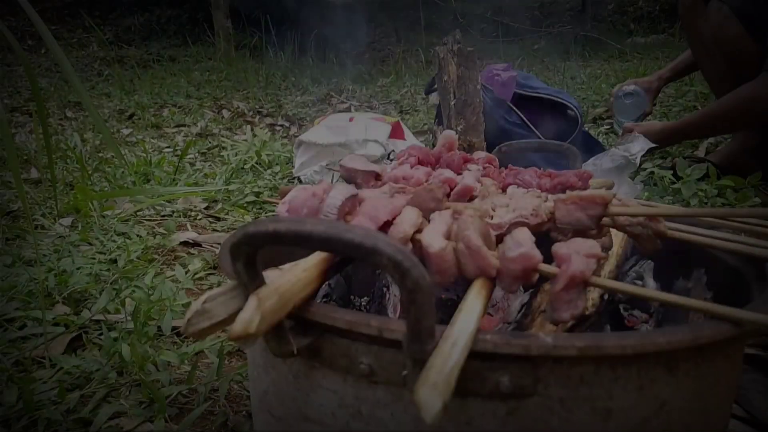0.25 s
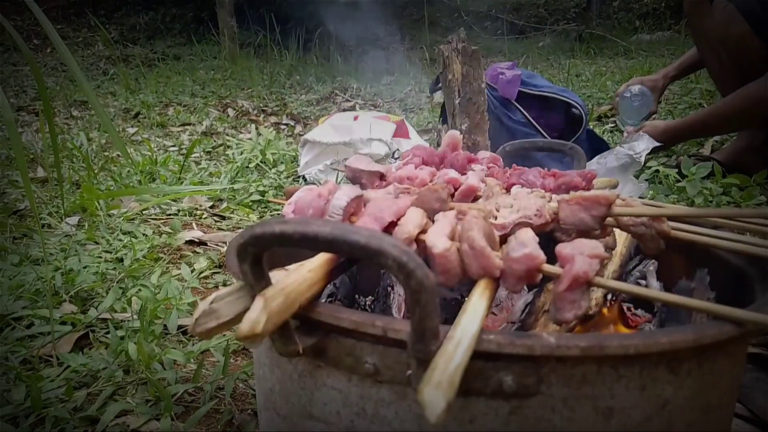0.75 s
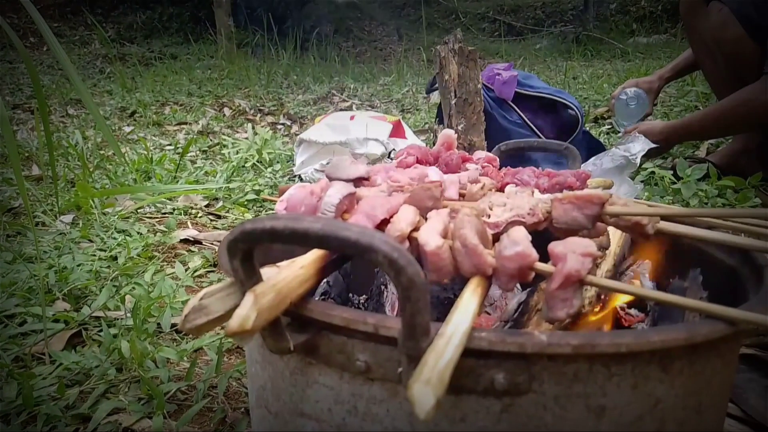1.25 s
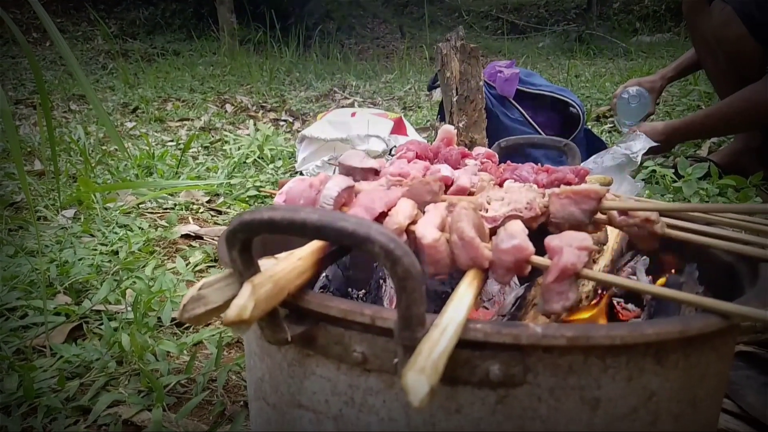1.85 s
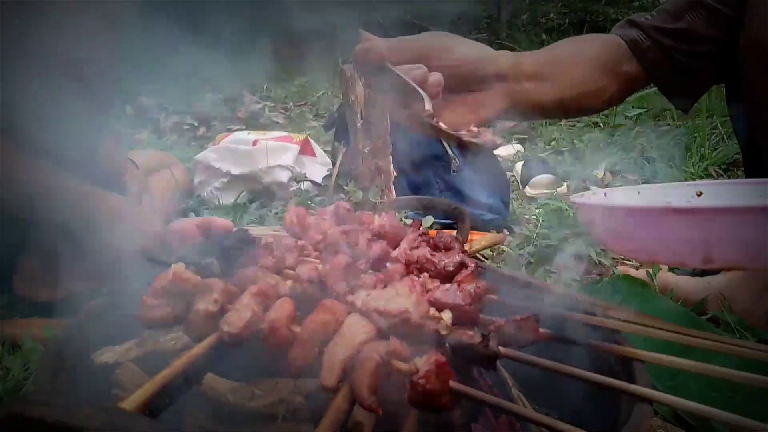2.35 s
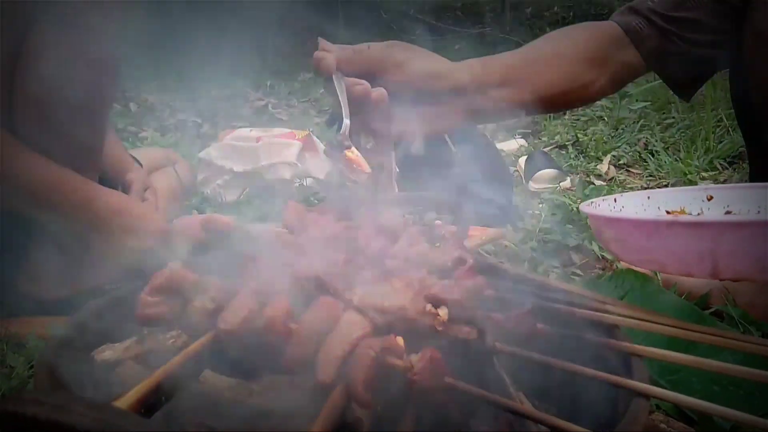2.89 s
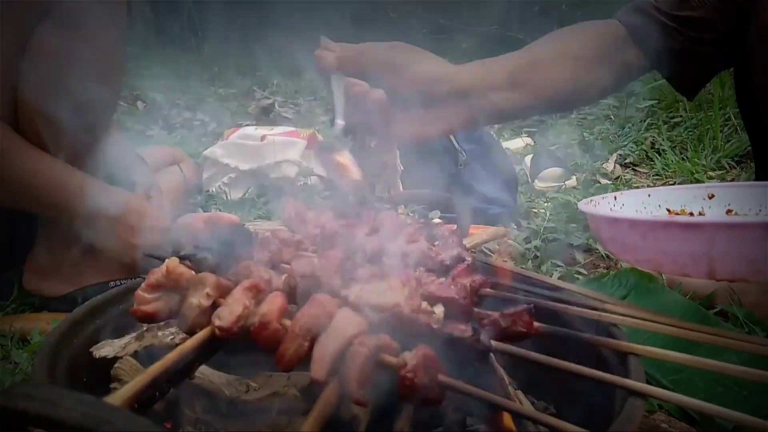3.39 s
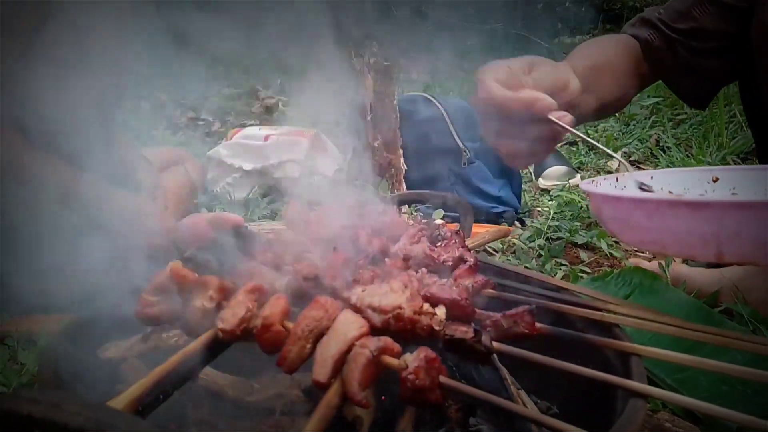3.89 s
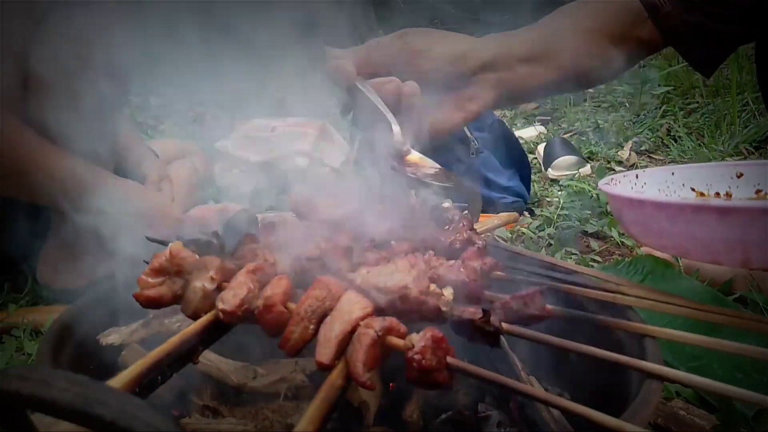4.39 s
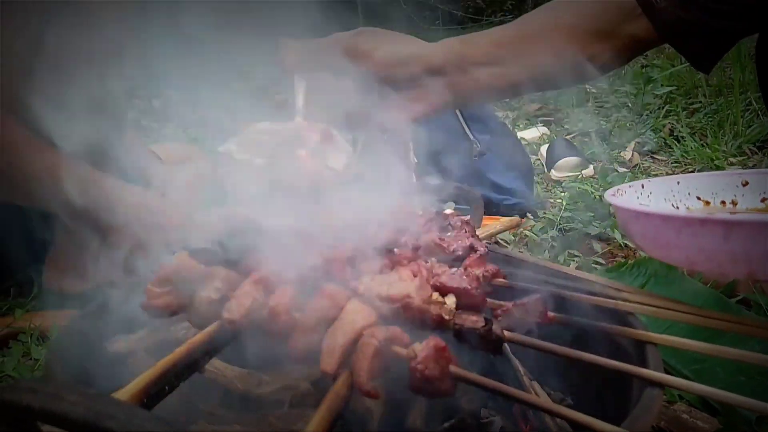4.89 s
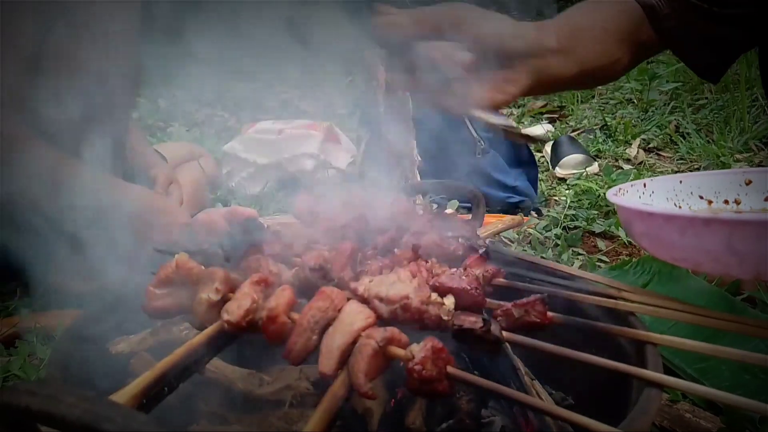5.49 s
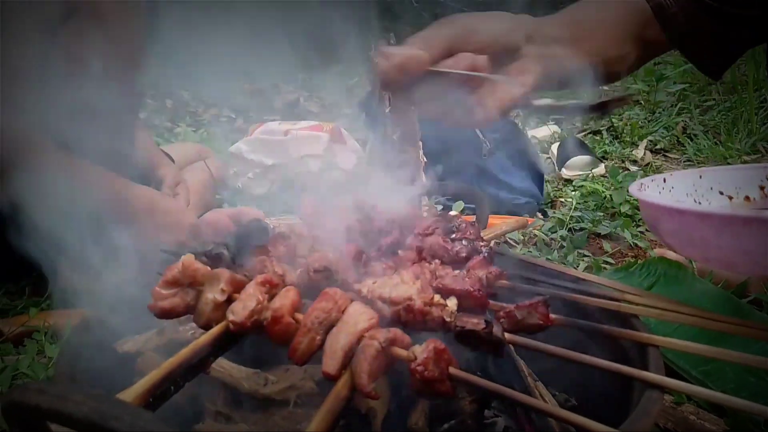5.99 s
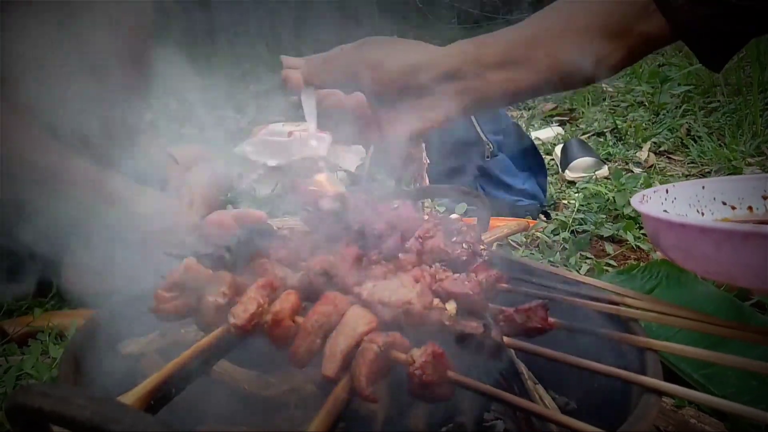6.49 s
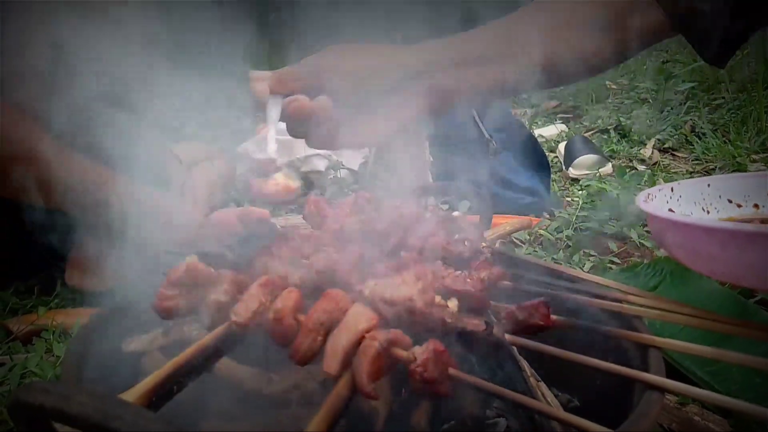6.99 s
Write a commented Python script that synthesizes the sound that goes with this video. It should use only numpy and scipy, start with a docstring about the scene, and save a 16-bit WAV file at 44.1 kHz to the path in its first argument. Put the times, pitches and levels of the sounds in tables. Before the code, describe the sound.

A cow's short tail of a moo, scattered metal clinks, a loud clang with gritty scraping, then two longer rising moos over faint outdoor rumble.

```python
"""A quiet farmyard in stereo: a cow moos three times, a little left of the microphones; voice pulses ring the head.
The first call starts open, the others as a closed-mouth hum; the first two end in a rasp,
the third stops just as its voice begins to break. Sheet metal clinks around the calls and once clangs,
as ringing modes; rubs of noise scrape, dry bursts snap. A far bird pipes in wavering sines
over a low outdoor rumble of shaped noise; yard and wall send echoes."""
import sys
import numpy as np
from scipy import signal
from scipy.fft import rfft, irfft
from scipy.io import wavfile
from scipy.ndimage import uniform_filter1d

SR = 44100
rng = np.random.default_rng(int(sys.argv[2]) if len(sys.argv) > 2 else 0)


def materialize(psi):
    """Save the field psi as 16-bit PCM at rate SR to the path in sys.argv[1].

    A 1-D psi becomes a single channel; in a 2-D psi each row is a channel.
    """
    bounded = np.clip(np.atleast_2d(psi).T, -1, 1)
    quanta = np.round(bounded * 32767).astype(np.int16)
    wavfile.write(sys.argv[1], SR, quanta)


N = 319725
TIME = np.arange(N) / SR

# pitch glide of the cow, one curve per call: (time [s], pitch [Hz])
CALL_PITCHES = [
    [(0.0, 148.9), (0.07, 152.6), (0.136, 148.7), (0.2, 143.2), (0.232, 138.6), (0.256, 141.6),
     (0.31, 136.8)],
    [(4.62, 101.8), (4.718, 111.3), (4.738, 118.9), (4.89, 138.9), (4.96, 144.9), (5.04, 144),
     (5.138, 149.7), (5.31, 152), (5.496, 159.3), (5.736, 155.5), (5.802, 149.1), (5.822, 145.4),
     (5.88, 131)],
    [(6.5, 103.4), (6.514, 104.1), (6.538, 110.7), (6.56, 111.1), (6.604, 115.2), (6.642, 110.2),
     (6.66, 116.1), (6.766, 137.6), (6.818, 144.6), (6.94, 152.1), (7.07, 155.7), (7.198, 160.2),
     (7.25, 160.1)],
]
# timing and head shape of each call, levels before effort and muffling:
# (mouth opens [s], opening takes [s], voice breaks [s], chest [dB], nose [dB], throat [dB],
#  palate [Hz], palate [dB], mouth [Hz], mouth [dB], lips [dB], edge [dB])
CALL_SHAPES = [(-0.1, 0.035, .188, -43.5, -28, -30, 1136, -18, 1705, -27.5, -24, -34.5),
               (4.985, .035, 5.725, -44, -30.5, -29.5, 1180, -31, 1637, -24.5, -44.5, -53.5),
               (6.74, 0.076, 7.24, -49, -27.5, -39, 1220, -29.5, 1678, -17.5, -30.5, -39.5)]
# stereo balance of the cow: (frequency [Hz], left over right [dB])
COW_BALANCE = [(850, .5), (1180, 4.5), (1620, -3), (2100, 5.5), (2900, 8.5)]
# modes of the sheet metal: (frequency [Hz], relative level [dB])
METAL_MODES = [(660, -5), (802, 1.5), (1663, -22), (3072, 2.5), (3303, 6.5), (3650, 0.5), (4070, 7),
               (4260, 4.5), (4560, -4), (4780, -2), (5080, -6), (5295, -0.5), (5410, -1), (5500, -3.5),
               (5815, 1), (6363, -10), (6590, -6.5), (7080, -5), (7396, -5.5), (8866, -3), (9300, -5),
               (9800, -5), (10249, -3.5), (10550, -12), (11230, -1.5), (11550, -5), (13420, -10.5)]
# blows on the metal, levels before the extra early ring:
# (time [s], boom [dB], ring [dB], hardness [0-1], ring centre [Hz], shimmer centre [Hz])
METAL_BLOWS = [(.010, -42, -52.5, 1, 4520, 9300), (0.515, -63, -42.5, 0.37, 4700, 11100),
               (0.647, -63, -39.5, 1, 4690, 11260), (.812, -72, -58.5, 0, 4070, 10000),
               (1.243, -57, -50.5, 0.33, 5030, 9250), (1.456, -44.5, -34.5, 0.58, 4990, 8750),
               (1.715, -56, -48, 0, 5260, 10600), (1.976, -62, -40, 0.15, 5340, 8600),
               (2.300, -56, -44.5, 0, 3480, 10600), (2.492, -69, -45.5, 0.92, 4580, 10500),
               (3.054, -24.5, -20, 0.26, 4280, 10240), (3.056, -29.5, -23.5, 0.24, 5640, 13380),
               (3.426, -41.5, -36.5, 0, 3660, 10750), (3.787, -57, -32, 0.2, 4520, 11700),
               (4.027, -46.5, -45, 0.32, 3610, 10460), (4.273, -56.5, -44, 0.98, 4080, 10340),
               (4.547, -54, -58, 0.46, 3400, 10250), (6.420, -65, -61, 0.36, 4220, 10440),
               (6.540, -64.5, -55, 0.4, 3400, 9900), (6.784, -62.5, -57, 0.28, 3620, 10420),
               (6.966, -61, -48, .75, 4800, 10960), (7.178, -46, -51.5, 0.6, 6130, 10350)]
# crowd of weak metal modes, heard as a wash: (frequency [Hz], relative density [dB per Hz])
METAL_WASH = [(300, -20), (750, 0.5), (1100, -14), (2200, -13.5), (3300, -0.5), (5600, -13), (7800, -10),
              (10500, -4.5), (15500, -26.5)]
# metal sliding on metal in short rubs: (time of peak [s], level [dB], fade to 1/e [s])
METAL_RUBS = [(3.105, -27, 0.033), (3.19, -31, 0.015), (3.241, -29.5, 0.0062), (3.276, -29, 0.035),
              (3.35, -42, 0.037)]
# dry snaps: (time [s], level [dB], 60 dB decay [s], main pitch [Hz], left over right [dB])
DRY_SNAPS = [(0.7223, -32.5, 0.031, 1490, -2.5), (3.243, -5, 0.00762, 6780, -8)]
# spectrum of a snap: (multiple of the main pitch, relative density [dB per Hz])
SNAP_COLOUR = [(.12, -45), (.26, -5), (.45, -1.5), (1, 7), (1.25, 0), (2.2, -16), (3.999, -43)]
# far bird notes: (time [s], level [dB])
BIRD_NOTES = [(0.448, -47), (2.838, -54), (6.592, -45.5)]
# spectrum of the outdoor air: (frequency [Hz], relative density [dB per Hz])
AIR_SPECTRUM = [(20, -14), (64, 1), (133, -6.5), (400, -17.5), (1050, -20.5), (1770, -28), (3000, -35),
                (6000, -41), (15500, -48)]
# likeness of the air on the two sides: (frequency [Hz], likeness [0-1])
AIR_LIKENESS = [(400, .96), (1200, .7), (3500, .2)]

# the cow pushes harder as the pitch climbs, which also sharpens the top of the voice
EFFORT_DB_PER_HZ, EASY_PITCH_HZ, BRIGHTEN_DB_PER_HZ = 0.4177, 150.77, 0.34
# below this pitch the folds are slack and grow rough
CLEAR_PITCH_HZ, SLACK_PER_HZ = 147.1, .013
# the break: time taken, most roughness added (0-1), time from the break until the air runs out
BREAK_S, RASP, RASP_HOLD_S = 0.04, .43, 0.063
# then the call dies; from the break on the closing mouth dulls it and the pitch sags
RELEASE_DB_PER_S, SHUT_DB_PER_S, SAG_HZ_PER_S = 236, 93, 190
ONSET_DB, ONSET_S = -9, 0.045   # the hum swells in from this far down
# shimmer against ring for a soft blow of usual strength, and what full hardness adds
SHIMMER_DB, SHIMMER_HARD_DB = -18.5, 17
SHIMMER_GROWTH, USUAL_BLOW_DB = 0.4, -46.5   # extra shimmer per dB above a usual blow
SOFT_SIDE_DB, HARD_SIDE_DB = 2.5, 5   # left over right when soft, and what full hardness adds


def from_db(db):
    """Decibels to gain."""
    return 10 ** (np.asarray(db) / 20)


def rms_one(x):
    """Scale to unit power."""
    return x / np.sqrt(np.mean(x ** 2) + 1e-20)


def in_time(rows, t):
    """Each column of a curve at the times t."""
    s, *columns = np.transpose(rows)
    return [np.interp(t, s, c) for c in columns]


def at_hz(points, hz):
    """Read a spectrum on a log-frequency axis."""
    f, value = np.transpose(points)
    return np.interp(np.log(hz + 1e-3), np.log(f), value)


def noise(spectrum, size):
    """Two unrelated channels of coloured noise."""
    gain = from_db(at_hz(spectrum, np.fft.rfftfreq(size, 1 / SR)))
    return rms_one(irfft(rfft(rng.standard_normal((2, size))) * gain, size))


def drift(rate_hz, size):
    """Smooth chance of spread 1."""
    sos = signal.butter(2, rate_hz, fs=SR, output="sos")
    return rms_one(signal.sosfilt(sos, rng.standard_normal(size + SR // 4))[-size:])


def pan(db):
    """Left and right gains of unit mean power; positive dB leans left."""
    gains = from_db(np.vstack([db / 2, -db / 2]))
    return gains / np.sqrt(np.mean(gains ** 2, axis=0))


def add(out, s, sound):
    """Mix a sound in from time s on."""
    start = max(round(s * SR), 0)
    part = sound[..., :N - start]
    out[..., start:start + part.shape[-1]] += part


def resonance(source, hz, width_hz, db):
    """A moving resonance, applied twice for steep flanks; its power is held at db over a few voice cycles."""
    r = np.exp(-np.pi * width_hz / SR)
    centre = np.exp(2j * np.pi * np.cumsum(hz * np.ones(len(source))) / SR)
    ring = np.real(centre * signal.lfilter([(1 - r) ** 2], [1, -2 * r, r * r], source / centre))
    power = uniform_filter1d(uniform_filter1d(ring ** 2, size=600), size=800)
    return from_db(db) * ring / np.sqrt(np.abs(power) + 1e-14)


def cow(lead_s=0.00011, bounce_s=.00625, bounce_db=-15):
    """Three calls from a little to the left, which hears them sooner and, at the top, brighter."""
    calls = np.zeros(N)
    for curve, call in zip(CALL_PITCHES, CALL_SHAPES):
        add(calls, curve[0][0], moo(curve, call))
    hz = np.fft.rfftfreq(N, 1 / SR)
    # a bounce off the ground makes the harmonics swell and fade as they glide
    bounce = 1 + from_db(bounce_db) * np.exp(-2j * np.pi * hz * bounce_s)
    left, right = rfft(calls) * bounce * pan(at_hz(COW_BALANCE, hz))
    late_right = right * np.exp(-2j * np.pi * hz * lead_s)
    return irfft([left, late_right], N)


def moo(curve, call, jitter=0.086, shimmer=1.0, turbulence=0.95, top_hz=3300, droop_hz=60,
        hum_db=-44, open_hum_db=-6, least_rough=.03):
    """Pulses of the vocal folds, uneven when rough, ring the resonances of the head."""
    (opens, opening_s, breaks, chest, nose, throat,
     palate_hz, palate, mouth_hz, mouth, lips, edge) = call
    t = np.arange(max(curve[0][0], 0), curve[-1][0], 1 / SR)
    pitch, = in_time(curve, t)

    # the possible stages: hum, open call, rasp, release; a call may start or stop partway
    opened = np.clip((t - opens) / opening_s, 0, 1)
    broken = np.clip((t - breaks) / BREAK_S, 0, 1)
    spent_s = np.maximum(t - breaks - RASP_HOLD_S, 0)
    effort = EFFORT_DB_PER_HZ * (pitch - EASY_PITCH_HZ) * (1 - broken)
    effort = effort - RELEASE_DB_PER_S * spent_s
    effort = effort + ONSET_DB * np.exp((t[0] - t) / ONSET_S) * (1 - opened)
    pitch = pitch - SAG_HZ_PER_S * np.maximum(t - breaks - BREAK_S / 2, 0)
    bright = BRIGHTEN_DB_PER_HZ * np.maximum(pitch - EASY_PITCH_HZ, 0)
    slack = SLACK_PER_HZ * np.maximum(CLEAR_PITCH_HZ - pitch, 0)
    rough = least_rough + np.minimum(slack + RASP * broken, RASP)

    # harmonics from the second up; the chest below supplies the fundamental
    phase = 2 * np.pi * np.cumsum(pitch * (1 + jitter * rough * drift(78, len(t)))) / SR
    pulses = rms_one(sum(np.cos(k * phase) for k in range(2, 30)))
    breath_band = signal.butter(2, [220, 4000], "band", fs=SR, output="sos")
    breath = rms_one(signal.sosfilt(breath_band, rng.standard_normal(len(t))))
    # air rushes through the folds once in each cycle
    rush = (rough + .05) * breath * (1 + np.cos(phase))
    source = pulses * (1 + shimmer * rough * drift(90, len(t))) + turbulence * rush

    def cavity(hz, width_hz, db, sharpness, muffled_db):
        """When open, weaker by sharpness dB per Hz to the nearest harmonic until the break; muffled when shut."""
        miss_hz = np.abs(hz - pitch * np.round(hz / pitch))
        miss_db = sharpness * miss_hz * opened * (1 - broken)
        return resonance(source, hz, width_hz, db + effort - miss_db + muffled_db * (1 - opened))

    voice = (cavity(hz=805.4, width_hz=130, db=throat - 5, sharpness=0.26, muffled_db=-24)
             + cavity(hz=934, width_hz=98, db=throat, sharpness=0.51, muffled_db=-32.5)
             + cavity(palate_hz, width_hz=100, db=palate, sharpness=0.22, muffled_db=-28)
             + cavity(mouth_hz, width_hz=182, db=mouth, sharpness=.15, muffled_db=-32.5)
             + cavity(hz=2063, width_hz=222, db=lips + 0.5, sharpness=0.07, muffled_db=-12)
             + cavity(hz=2420, width_hz=200, db=lips - 8.5 + bright, sharpness=0.087, muffled_db=-20)
             + cavity(hz=2863, width_hz=170, db=edge + bright, sharpness=0.087, muffled_db=-21))
    voice = voice * from_db(-SHUT_DB_PER_S * np.maximum(t - breaks, 0))
    voice += cavity(hz=320 - droop_hz * rough, width_hz=75.0, db=nose, sharpness=0.37, muffled_db=-17.5)
    # a soft hum through the closed mouth, soon drowned by the open call
    hum_level_db = hum_db + open_hum_db * opened + np.minimum(effort, 0)
    voice += resonance(source, hz=399.5, width_hz=110, db=hum_level_db)
    # the chest hums the fundamental and soon reaches its limit
    chest_db = chest + np.minimum(effort, 0) - 10 * (1 - opened)
    voice += np.sqrt(2) * from_db(chest_db) * np.sin(phase)

    voice = signal.sosfilt(signal.butter(8, top_hz, fs=SR, output="sos"), voice)
    return voice * np.clip(np.minimum(t - t[0], t[-1] - t) / .004, 0, 1)   # 4 ms fades


def clinks(focus_octaves=0.11, others_db=-14, t60=0.25, wash_db=-16, wash_t60=0.41,
           first_db=3, first_t60=0.361, rise_s=0.0018, twin=0.41, split_hz=22):
    """The spot struck decides which modes speak; the first loud ring soon spreads through the sheet."""
    out, t = np.zeros((2, N)), np.arange(SR // 2) / SR
    hz, mode_db = np.transpose(METAL_MODES)
    # t60 holds at 4 kHz; higher modes die a little sooner, by the power below
    decay = from_db(-60 * t / t60 * (hz[:, None] / 4000) ** 0.1)
    rings = np.exp(2j * np.pi * hz[:, None] * t) * decay
    # each mode has a close twin, so the rings beat unevenly
    split = split_hz * rng.standard_normal((len(hz), 1))
    rings = rings * (0.56 + twin * np.exp(2j * np.pi * split * t))
    low, high = hz < 2500, hz > 8000
    for s, boom_db, ring_db, hardness, ring_hz, shimmer_hz in METAL_BLOWS:
        # hard and strong blows shimmer
        shimmer_db = ring_db + SHIMMER_DB + SHIMMER_HARD_DB * hardness
        shimmer_db += SHIMMER_GROWTH * (ring_db - USUAL_BLOW_DB)
        # hard blows land further left
        side_db = SOFT_SIDE_DB + HARD_SIDE_DB * hardness
        off_centre = np.log2(hz / np.where(high, shimmer_hz, ring_hz)) / focus_octaves
        focus = from_db(others_db) + np.exp(-off_centre ** 2)
        weight = from_db(mode_db) * np.where(low, 1, focus)
        for group, db in ((low, boom_db), (~low & ~high, ring_db), (high, shimmer_db)):
            weight[group] *= from_db(db) / np.linalg.norm(weight[group])
        # short waves reach the two sides out of step
        turn = rng.random(len(hz)) + rng.random((2, len(hz))) * np.where(low, .1, 1)
        ring = np.real((weight * np.exp(2j * np.pi * turn)) @ rings)
        ring = ring * (1 + from_db(first_db - 60 * t / first_t60))
        wash = noise(METAL_WASH, len(t)) * from_db(ring_db + wash_db - 60 * t / wash_t60)
        add(out, s, (ring + wash) * (1 - np.exp(-t / rise_s)) * pan(side_db))
    return out


def scrape(grain_db=2.0, singing_db=1, mode_width_hz=30, side_db=4, rise_s=.021):
    """Gritty friction hisses and keeps the upper modes singing; each rub swells and fades."""
    t = np.arange(METAL_RUBS[0][0] - .1, METAL_RUBS[-1][0] + .2, 1 / SR)
    power = 0
    for s, db, fade_s in METAL_RUBS:
        shape = np.exp(-np.where(t < s, ((s - t) / rise_s) ** 2, (t - s) / fade_s))
        power = power + (from_db(db) * shape) ** 2
    level = np.sqrt(power)
    grit = noise(METAL_WASH, len(t)) * from_db(grain_db * drift(300, len(t)))
    upper_modes = [(hz, db) for hz, db in METAL_MODES if hz > 5200]
    singing = rms_one(np.array([sum(resonance(side, hz, mode_width_hz, db) for hz, db in upper_modes)
                                for side in grit]))
    # the hiss of the contact itself is brighter than the ringing
    grit = rms_one(grit + np.diff(grit, prepend=0))
    out = np.zeros((2, N))
    add(out, t[0], (grit + from_db(singing_db) * singing) * level * pan(side_db))
    return out


def snaps(rise_s=0.00024):
    """Hard contacts that die at once: short bursts of coloured noise."""
    out, t = np.zeros((2, N)), np.arange(SR // 20) / SR
    for s, db, t60, hz, side_db in DRY_SNAPS:
        crack = noise([(hz * multiple, level) for multiple, level in SNAP_COLOUR], len(t))
        envelope = from_db(db - 60 * t / t60) * np.minimum(t / rise_s, 1)
        add(out, s, crack * envelope * pan(side_db))
    return out


def bird(pitch_hz=1785, half_length_s=0.018, waver=.02):
    """Short pipes: a slightly wavering sine, let through in smooth bumps."""
    tone = np.sin(2 * np.pi * pitch_hz * np.cumsum(1 + waver * drift(100, N)) / SR)
    return tone * sum(from_db(db) * np.exp(-((TIME - s) / half_length_s) ** 2) for s, db in BIRD_NOTES)


def yard(x, wet_db=-21, t60=0.15, delay_s=0.019, width=1.0):
    """Scattered echoes from the ground and the sheds: decaying noise that fades in after delay_s."""
    t = np.arange(SR // 2) / SR
    decay = from_db(-60 * t / t60) * np.clip(t / delay_s - 1, 0, 1)
    mid, side = noise([(1500, 7.5), (15000, -22.5)], len(t)) * decay
    # long waves reach both sides alike
    side = signal.sosfilt(signal.butter(2, 900, "high", fs=SR, output="sos"), side)
    echo = np.array([mid + width * side, mid - width * side]) / np.linalg.norm(mid)
    return from_db(wet_db) * signal.fftconvolve(x, echo, axes=1)[:, :N]


def outdoor_air(mid_db=-54):
    """A steady rumble, alike on both sides in the bass, under a faint wide hiss."""
    mid, side = rfft(noise(AIR_SPECTRUM, N))
    alike = np.clip(at_hz(AIR_LIKENESS, np.fft.rfftfreq(N, 1 / SR)), 0, 1)
    side = side * np.sqrt((1 - alike) / (1 + alike))
    return from_db(mid_db) * irfft([mid + side, mid - side], N)


def scene(wall_s=.058, wall_db=-15):
    """Cow, metal and bird with their echoes, over the outdoor air; a wall throws the clinks back once."""
    metal = clinks()
    add(metal, wall_s, from_db(wall_db) * metal)
    sources = cow() + metal + scrape() + snaps() + bird()
    return sources + yard(sources) + outdoor_air()


def record(dry, cutoff_hz=15900):
    """Peaks stop at full scale and the top is cut."""
    low_pass = signal.ellip(10, .1, 70, cutoff_hz, fs=SR, output="sos")
    return signal.sosfilt(low_pass, np.clip(dry, -1, 1))


dry = scene()
out = record(dry)
materialize(out)
```